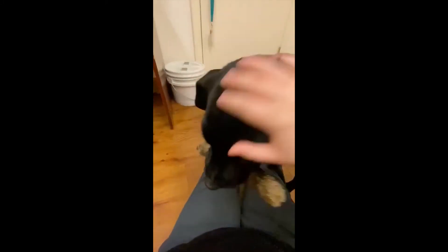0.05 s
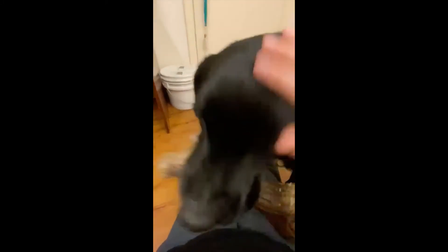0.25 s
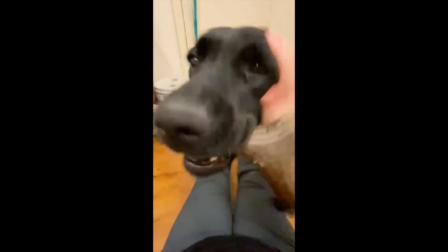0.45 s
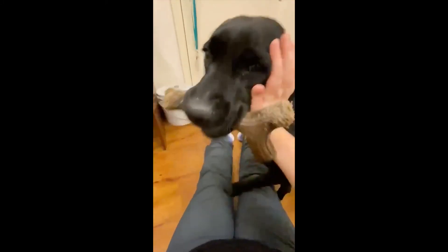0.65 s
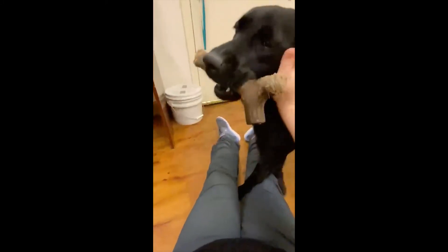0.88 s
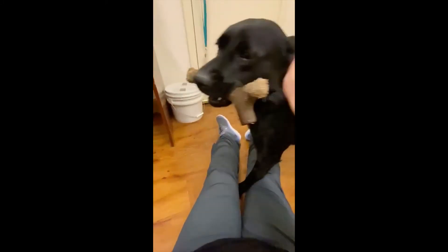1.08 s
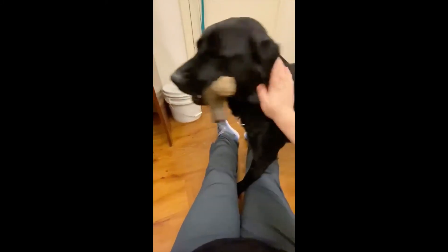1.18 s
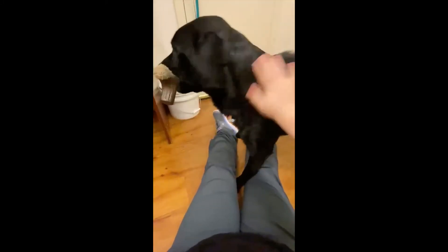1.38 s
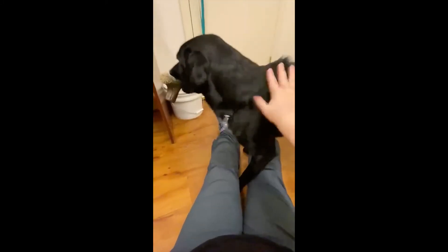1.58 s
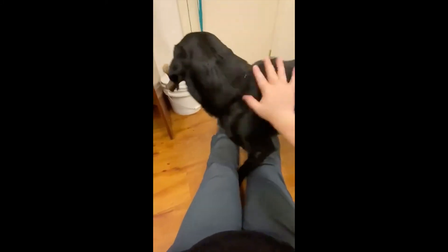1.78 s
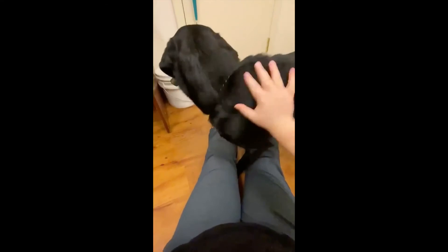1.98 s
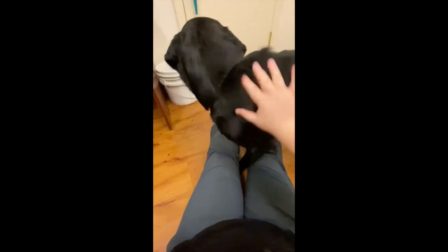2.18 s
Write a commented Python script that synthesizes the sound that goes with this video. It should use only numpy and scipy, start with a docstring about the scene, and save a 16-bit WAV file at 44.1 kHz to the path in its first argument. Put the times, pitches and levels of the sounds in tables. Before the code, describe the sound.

A hand strokes a dog's coat, soft hiss over a low rumble, then hollow knocks and teeth clicks from a chew toy; crisper back strokes follow, close by in a small quiet room.

```python
"""A wide low rumble and a soft hiss of fur come first, then a hollow knock: close by in a small quiet
room, a hand strokes a dog that holds a chew toy. Shaped noise makes the coat hiss, tufts flick and
the palm rub dully; the toy is short rings with a clatter of teeth, and only it gets an added room tail.
The wide rumble comes and goes with two long sweeps of the hand, over a wavering hum and faint room air."""
import sys
import numpy as np
from scipy import signal
from scipy.fft import rfft, irfft
from scipy.io import wavfile

SR = 44100
rng = np.random.default_rng(int(sys.argv[2]) if len(sys.argv) > 2 else 0)


def materialize(psi):
    """Save the field psi as 16-bit PCM at rate SR to the path in sys.argv[1].

    A 1-D psi becomes a single channel; in a 2-D psi each row is a channel.
    """
    bounded = np.clip(np.atleast_2d(psi).T, -1, 1)
    quanta = np.round(bounded * 32767).astype(np.int16)
    wavfile.write(sys.argv[1], SR, quanta)


N = 99225
T = np.arange(N) / SR  # seconds
HZ = np.maximum(np.fft.rfftfreq(N, 1 / SR), 1)


def from_db(db):
    """Decibels to amplitude gain."""
    return 10 ** (np.asarray(db) / 20)


def rms_one(x):
    """Scale to unit power, over both sides together if stereo."""
    return x / np.sqrt(np.mean(x ** 2) + 1e-20)


def in_time(rows):
    """Each column of a curve, read at every sample."""
    s, *columns = np.transpose(rows)
    return [np.interp(T, s, column) for column in columns]


def in_hz(rows):
    """Each column of a spectrum, read at every frequency on a log scale."""
    hz, *columns = np.transpose(rows)
    return [np.interp(np.log(HZ), np.log(hz), column) for column in columns]


def drift(rate_hz):
    """Random wandering, rms 1: white noise with little left above the given rate."""
    spectrum = rfft(rng.standard_normal(N))
    return rms_one(irfft(spectrum / (1 + (HZ / rate_hz) ** 4), N))


def moving_band(hz, width_hz):
    """A band of noise around a moving centre, rms near 1: two drifts on a carrier in quadrature."""
    turn = 2 * np.pi * np.cumsum(hz) / SR
    return drift(width_hz / 2) * np.cos(turn) + drift(width_hz / 2) * np.sin(turn)


def noise(colour, alike, lead=0):
    """Coloured stereo noise, rms 1; likeness -1 to 1, and the radians by which the left leads."""
    mid, side = rfft(rng.standard_normal((2, N)))
    alike = np.clip(alike, -.99, .99)
    mid = np.sqrt(1 + alike) * mid
    side = np.sqrt(1 - alike) * side
    left = mid + side
    right = (mid - side) * np.exp(-1j * lead)
    return rms_one(irfft(np.array([left, right]) * from_db(in_hz(colour)[0]), N))


def burst(start, rise, fade):
    """A quick rise and an exponential fade, both given as time constants in seconds."""
    age = np.maximum(T - start, 0)
    return (1 - np.exp(-age / rise)) * np.exp(-age / fade)


def rippled(x):
    """Reflections off nearby surfaces leave fine random peaks and dips in the spectrum."""
    ripple_db, delay_spread_s = 2.5, 0.0072
    echoes = rng.standard_normal(N) * np.exp(-T / delay_spread_s)
    ripple = rms_one(rfft(echoes).real)
    return irfft(rfft(x) * from_db(ripple_db * ripple), N)


def hairs():
    """Envelope of single hairs slipping at random, each slip dying away exponentially; rms 1."""
    slips_per_s, spread_db, fade_s = 1300, 2, 0.0005
    strengths = from_db(spread_db * np.minimum(rng.exponential(1, N), 4))
    slips = (rng.random(N) < slips_per_s / SR) * strengths
    return rms_one(signal.lfilter([1], [1, -np.exp(-1 / (fade_s * SR))], slips + 1e-18))


def fur():
    """Strokes swell and fade: smooth hiss on the head, crisper on the back, with tufts and palm rub."""
    # Strokes through the coat. Each row: peak in seconds, half length in seconds (to 1/e),
    # hiss level in dB, palm rub level in dB.
    stroke_rows = [(0, 0.03, -61.5, -61), (0.119, 0.021, -62, -67), (.275, 0.029, -58.5, -67),
                   (0.52, 0.02, -51.5, -63), (0.544, 0.0097, -70, -52), (0.629, 0.046, -53, -58),
                   (0.788, 0.058, -57.5, -62), (1.169, 0.072, -68.5, -63.5), (1.328, 0.028, -72, -60),
                   (1.395, 0.069, -59.5, -60.5), (1.581, 0.017, -53, -68.5), (1.724, 0.11, -62, -69),
                   (1.979, 0.031, -63, -65.5), (2.092, 0.023, -56.5, -59.5), (2.19, 0.039, -62, -57)]
    # Tufts flicking off the fingers. Each row: peak in seconds, level in dB, half length in seconds.
    flick_rows = [(0.537, -43, 0.0063), (1.153, -56.5, 0.006), (1.336, -54, 0.015), (1.484, -56, 0.012),
                  (1.55, -49.5, 0.0018), (1.56, -49, 0.0025), (1.572, -46, 0.0028), (1.649, -47, 0.0025),
                  (1.68, -48.5, .005), (1.755, -49.5, 0.0023), (1.895, -55.5, 0.014)]
    # Colours of the hiss on head and back and of the palm's rub. Each row: frequency in Hz, level in dB.
    head_colour = [(1500, -11), (4000, -6.5), (5500, 4.5), (7600, -7.5), (8400, -4), (10500, -7),
                   (12700, -7.5), (15700, -12)]
    back_colour = [(1500, -16), (3500, -7), (4300, -1.5), (7500, 0), (10000, -3), (15700, -6)]
    rub_colour = [(300, -25), (750, 10.5), (1600, 3), (6000, -5.5), (10000, -82)]
    # The two microphone ports as the hiss reaches them. Each row: frequency in Hz,
    # likeness of the sides from 0 to 1, lead of the left in radians.
    port_rows = [(3300, 0, 0.5), (5940, 1, 1.4), (6090, 1, 1.56), (7320, 1, 2.95), (10400, 1, 6.03),
                 (15700, 1, 11.5)]
    on_back_s, back_hairs_db = 1.0, -2.5
    drag_db, drag_hz = 1.0, 40.8  # the fingers drag unevenly
    stroke_shape = 1.244  # 1 gives a pointed swell, 2 a rounded one

    ports = in_hz(port_rows)
    on_back = np.clip((T - on_back_s) * 10, 0, 1)  # the hand crosses over in 0.1 s
    head_hiss = np.sqrt(1 - on_back) * noise(head_colour, *ports)
    hiss = head_hiss + np.sqrt(on_back) * noise(back_colour, *ports)

    crisp = on_back * from_db(back_hairs_db)
    grain = np.sqrt((1 + (crisp * hairs()) ** 2) / (1 + crisp ** 2))
    texture = grain * from_db(drag_db * drift(drag_hz))

    s, half, hiss_db, rub_db = np.transpose(stroke_rows)
    swells = np.exp(-np.abs((T[:, None] - s) / half) ** stroke_shape)
    fingers = np.sqrt(swells @ from_db(hiss_db) ** 2)  # overlapping strokes add as power
    palm = np.sqrt(swells @ from_db(rub_db) ** 2)
    flicks = sum(from_db(db) * np.exp(-((T - peak) / width) ** 2) for peak, db, width in flick_rows)
    coat = np.hypot(fingers, flicks) * rippled(hiss)
    rub = palm * rippled(noise(rub_colour, alike=0.27, lead=0.64))
    return texture * (coat + rub)


def rasps():
    """Fingertips catch abruptly and rake in coarse grains, a noise band that climbs and then lingers faintly."""
    # Fingertips digging in. Each row: start in seconds, length of the climb in seconds,
    # level in dB before the contact curve, first and last centre in Hz.
    rasp_rows = [(1.286, 0.13, -64, 2000, 4350), (2.054, 0.073, -58, 2210, 5760)]
    width_hz, edge_s = 1630, 0.0029
    grain_db, grain_hz = 4.5, 255
    out = 0
    for s, length, db, first_hz, last_hz in rasp_rows:
        # The last value holds to the end, so a weak band stays at the final pitch.
        contact = np.interp(T - s, [0, edge_s, length, length + 2 * edge_s], [0, 0.66, 0.072, 0.16])
        hz = np.interp(T - s, [0, length], [first_hz, last_hz])
        shared, left, right = (moving_band(hz, width_hz) for _ in range(3))
        band = rms_one(shared + .5 * np.array([left, right]))
        out = out + from_db(db) * contact * band
    return out * rms_one(from_db(grain_db * drift(grain_hz)))


def brush():
    """Dull brushing: narrow resonances of friction whose shared centre follows the hand."""
    # Course of the brushing. Each row: time in seconds, level in dB before resonances and pan, centre in Hz.
    brush_rows = [(0, -61, 469), (.42, -62.5, 430.2), (1.04, -62.5, 452.4), (1.11, -60, 465),
                  (1.27, -54.5, 485.7), (1.72, -56, 346), (1.84, -67, 299.6), (2.25, -57, 390)]
    # Resonances. Each row: multiple of the centre, level in dB.
    mode_rows = [(.76, -7), (1, -0.5), (1.27, -6)]
    width_hz = 103
    db, hz = in_time(brush_rows)
    bands = sum(from_db(mode_db) * moving_band(multiple * hz, width_hz) for multiple, mode_db in mode_rows)
    return from_db(db) * bands * from_db([[-1.8], [1.5]])  # leans right


def toy():
    """Knocks in the jaws: a short hollow ring that holds on faintly, a low body note, and clattering teeth."""
    # Knocks. Each row: start in seconds, level in dB before the pan, pitch in Hz, fade in seconds,
    # level of the lingering ring in dB relative to the knock.
    knock_rows = [(.2427, -10, 504, 0.0063, -34.5), (0.5415, -27, 723, 0.0026, -33),
                  (.5485, -29, 410, 0.0025, -25), (.7125, -15, 597, 0.0026, -29.5),
                  (.7305, -23.5, 661.6, 0.0031, -19.5), (.7565, -43, 718, 0.0039, -20),
                  (.7635, -28, 297.4, 0.0022, -23.5), (.864, -35.5, 655, 0.0042, -35)]
    # Teeth clattering on the toy. Each row: start in seconds, level in dB before the pan.
    tick_rows = [(0.2437, -56), (0.7103, -48), (0.7233, -45.5), (0.751, -52), (0.758, -57)]
    # Colour of the clatter. Each row: frequency in Hz, level in dB.
    tick_colour = [(1600, 1.5), (2600, 5), (3400, -7), (5500, -3), (10000, -50)]
    rise_share, linger_fades = 0.84, 13.8  # rise and lingering, in units of the fade
    damp_s = 0.019  # then the jaws damp the ring
    rough, rough_width_hz = 0.44, 163  # the lingering ring is uneven
    body_hz, body_db, body_fade_s = 245, -20, 0.0071  # body level is relative to the knock
    pan_db, left_lag_s = 3, .0001  # right over left; the lag shifts only the phase of the tones

    rings = 0
    for s, db, hz, fade, linger_db in knock_rows:
        age = T - s - np.array([[left_lag_s], [0]])
        rise, hold = rise_share * fade, linger_fades * fade
        tone = np.sin(2 * np.pi * hz * age)
        ring = burst(s, rise, fade) * tone
        uneven = .5 * tone + rough * moving_band(np.full(N, hz), rough_width_hz)
        damping = np.interp(T - s, [hold, hold + damp_s], [1, 0])
        linger = burst(s, rise, 2 * hold) * damping * uneven
        body = burst(s, rise, body_fade_s) * np.sin(2 * np.pi * body_hz * age)
        rings = rings + from_db(db) * (ring + from_db(linger_db) * linger + from_db(body_db) * body)
    ticks = sum(from_db(db) * burst(s, 0.0002, 0.006) for s, db in tick_rows)
    clatter = ticks * noise(tick_colour, alike=0.16)
    return (rings + clatter) * from_db([[-pan_db / 2], [pan_db / 2]])


def thumps():
    """Muffled bumps of the dog's body as it shifts: a deep tone in a puff of noise."""
    # Bumps. Each row: start in seconds, level of the puff in dB before its rise and fade.
    thump_rows = [(0.741, -43), (1.835, -52.5)]
    # Colour of the puff. Each row: frequency in Hz, level in dB.
    puff_colour = [(30, -2), (70, 1), (300, 19), (800, -43)]
    rise_s, fade_s = 0.014, 0.021
    tone_hz, tone_db = 78.4, 12.5  # tone level is relative to the puff
    puff = noise(puff_colour, alike=0.95)
    out = 0
    for s, db in thump_rows:
        tone = from_db(tone_db) * np.sin(2 * np.pi * tone_hz * (T - s))
        out = out + from_db(db) * burst(s, rise_s, fade_s) * (puff + tone)
    return out


def room(x):
    """A short diffuse tail of decaying noise, partly alike on both sides."""
    t60_s, level_db, gap_s = 0.11, -12, 0.0092
    tail = noise([(100, -13.5), (8000, -20)], alike=0.31)
    tail = tail * from_db(-60 * T / t60_s) * (T > gap_s)
    return from_db(level_db) * signal.fftconvolve(x, rms_one(tail) / np.sqrt(N), axes=1)[:, :N]


def background():
    """Air, drone and hum; in the long sweeps the lows give way to a rumble opposed in the two ears."""
    # Long sweeps of the hand. Each row: start in seconds, end in seconds.
    sweep_rows = [(-.05, 0.21), (1.18, 1.71)]
    # Throbs of the hum during the second sweep. Each row: peak in seconds, peak level in dB.
    throb_rows = [(1.368, -48.5), (1.44, -56), (1.505, -54), (1.575, -59), (1.633, -52.5), (1.70, -56),
                  (1.77, -52)]
    # Colours of the rumble, the room's low drone and its faint air. Each row: frequency in Hz, level in dB.
    rumble_colour = [(30, -19), (85, 12.5), (170, -2), (800, -17), (2000, -59)]
    drone_colour = [(25, -14.5), (85, 1.5), (160, -10), (260, -5), (900, -55.5)]
    air_colour = [(190, -25), (275, 6), (340, -1), (1600, -23), (5500, -36), (15000, -39.5)]
    rise_s, fall_s, dip_db = 0.095, 0.12, -17  # the sweeps, and how far they lower hum and drone
    rumble_db, drone_db, air_db = -45, -56.5, -59
    hum_hz, hum_db, waver_db, waver_hz = 100, -53, 2, 66
    throb_half_s = .024

    sweeping = sum(np.interp(T, [start - rise_s, start, end, end + fall_s], [0, 1, 1, 0])
                   for start, end in sweep_rows)
    tone = np.sin(2 * np.pi * hum_hz * T)
    hum = from_db(hum_db + waver_db * drift(waver_hz)) * np.sqrt(2) * tone
    drone = from_db(drone_db) * noise(drone_colour, alike=0.94)
    lows = (hum + drone) * from_db(dip_db * sweeping)
    throbs = tone * sum(from_db(db) * np.exp(-((T - peak) / throb_half_s) ** 2) for peak, db in throb_rows)
    rumble = from_db(rumble_db) * sweeping * noise(rumble_colour, alike=-0.99)
    air_alike = in_hz([(250, 0.77), (1200, 0.033)])[0]  # the sides agree less higher up
    air = from_db(air_db) * noise(air_colour, alike=air_alike)
    return lows + throbs + rumble + air


def scene():
    """Hand, dog and room together; the room tail answers the toy alone."""
    knocks = toy()
    return fur() + rasps() + brush() + knocks + room(knocks) + thumps() + background()


def record(dry):
    """The top is cut steeply above 15.8 kHz by an elliptic low-pass."""
    lowpass = signal.ellip(12, .1, 70, 15800, fs=SR, output="sos")
    return signal.sosfilt(lowpass, dry)


dry = scene()
out = record(dry)
materialize(out)
```